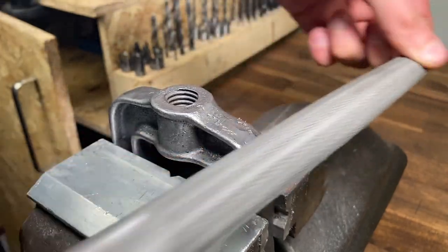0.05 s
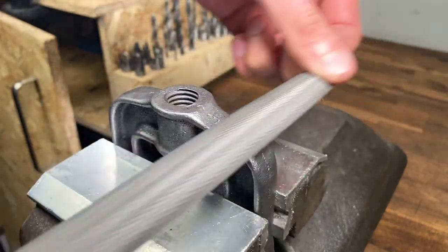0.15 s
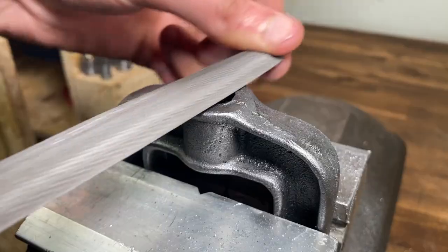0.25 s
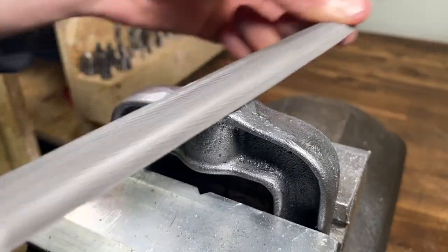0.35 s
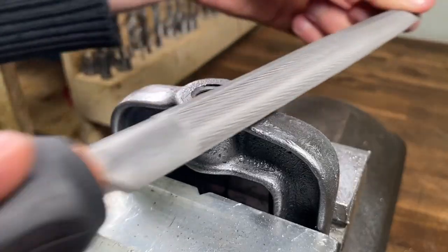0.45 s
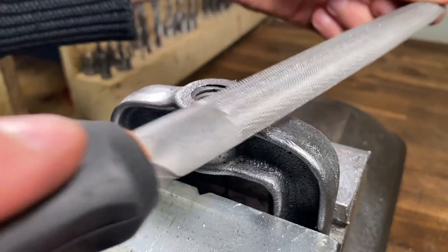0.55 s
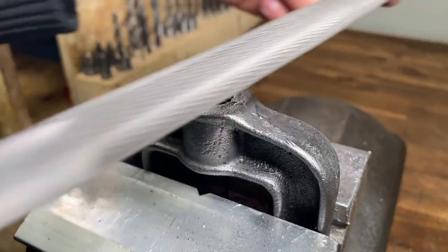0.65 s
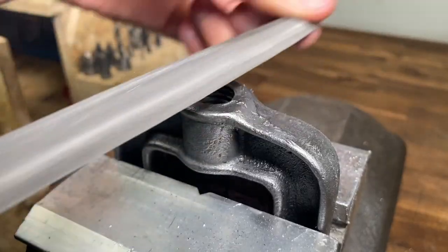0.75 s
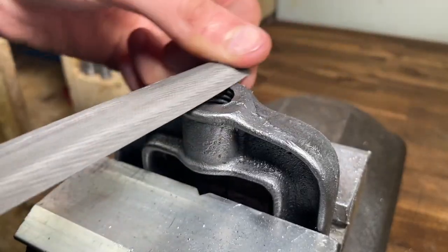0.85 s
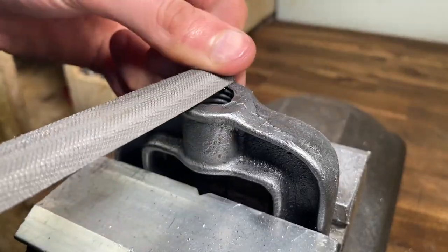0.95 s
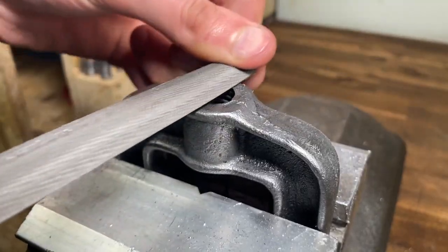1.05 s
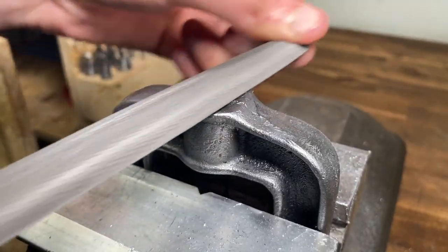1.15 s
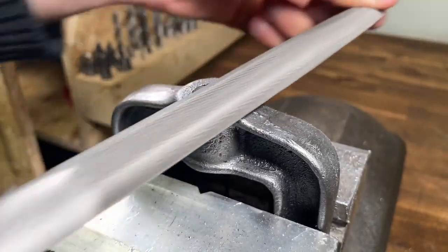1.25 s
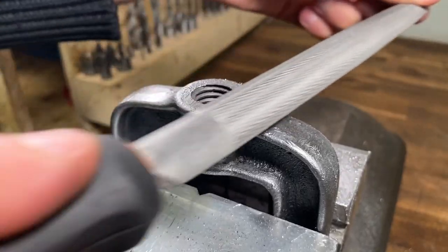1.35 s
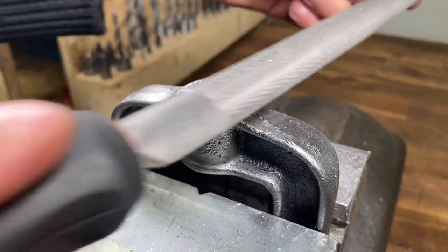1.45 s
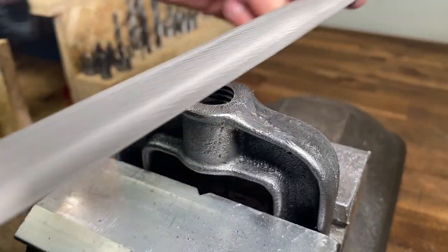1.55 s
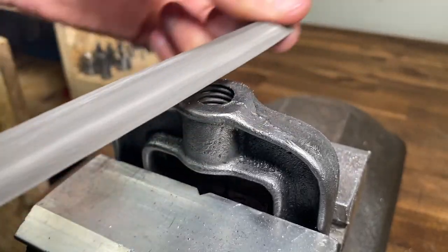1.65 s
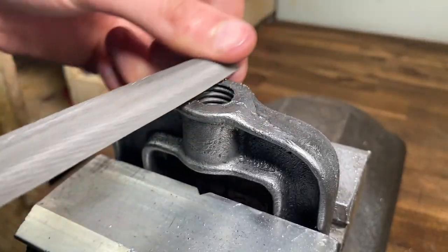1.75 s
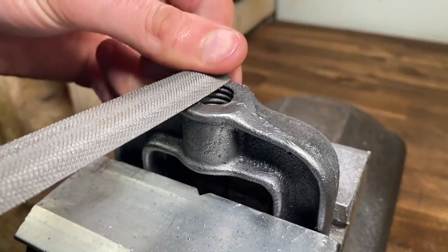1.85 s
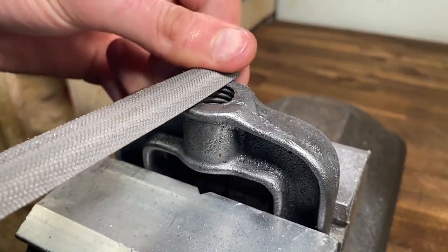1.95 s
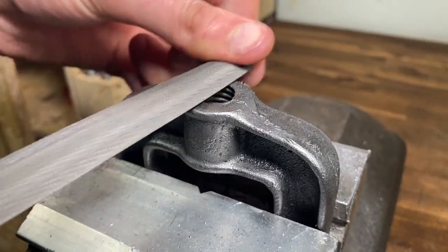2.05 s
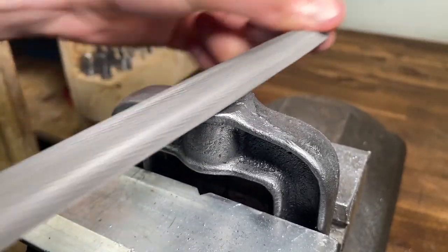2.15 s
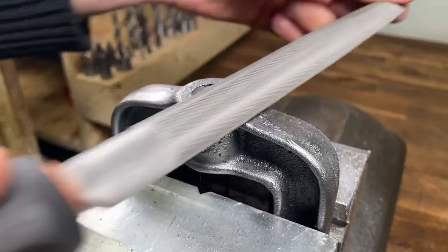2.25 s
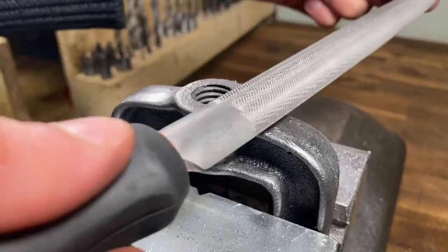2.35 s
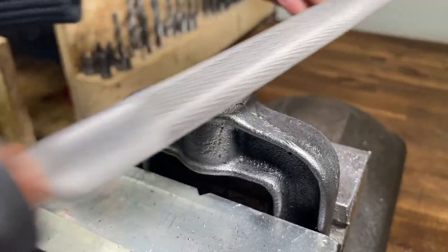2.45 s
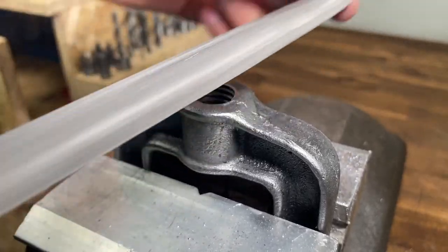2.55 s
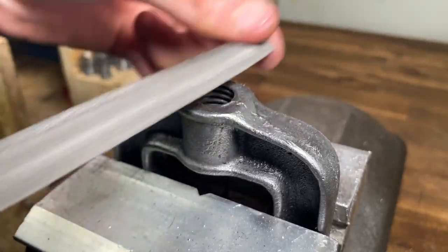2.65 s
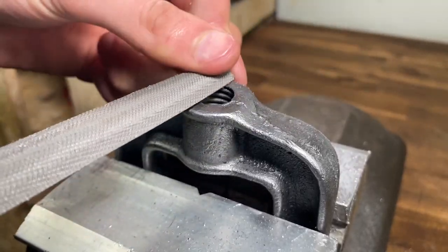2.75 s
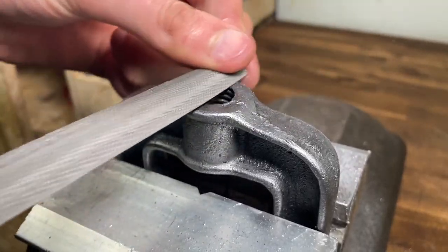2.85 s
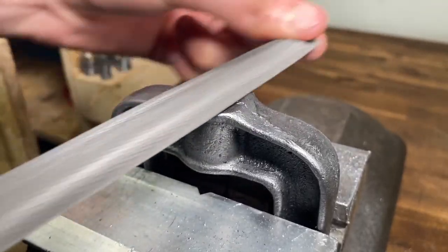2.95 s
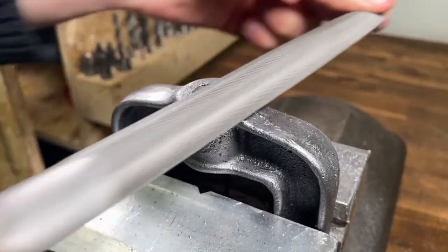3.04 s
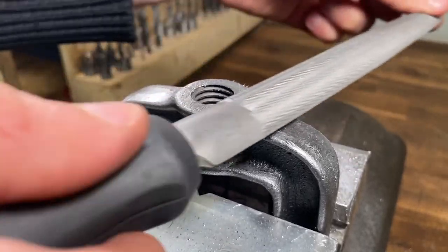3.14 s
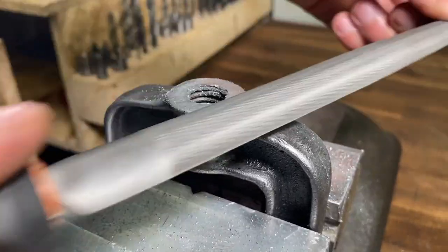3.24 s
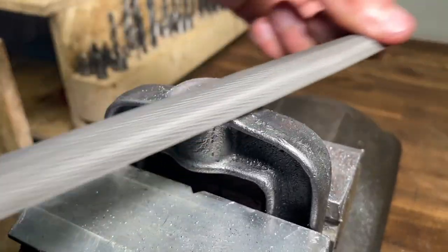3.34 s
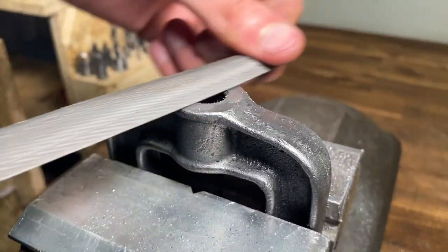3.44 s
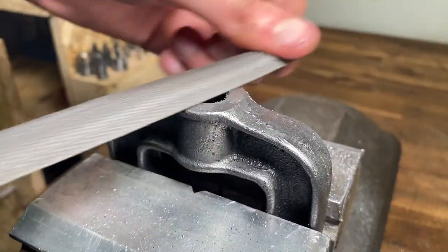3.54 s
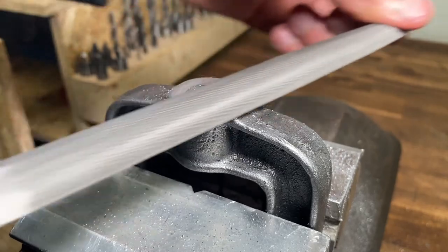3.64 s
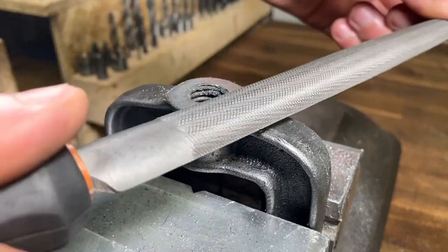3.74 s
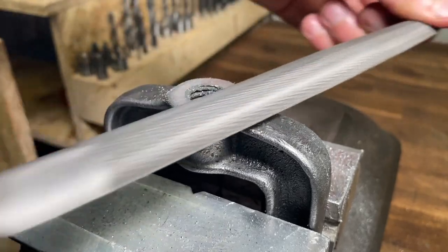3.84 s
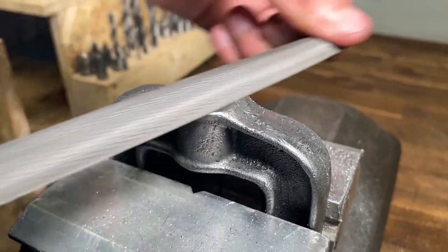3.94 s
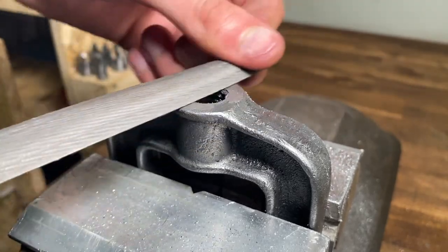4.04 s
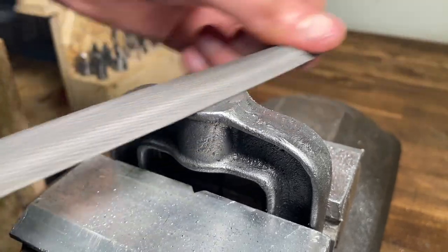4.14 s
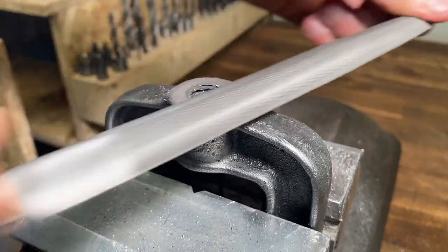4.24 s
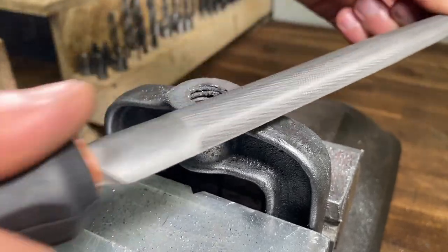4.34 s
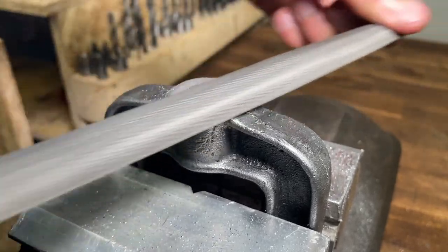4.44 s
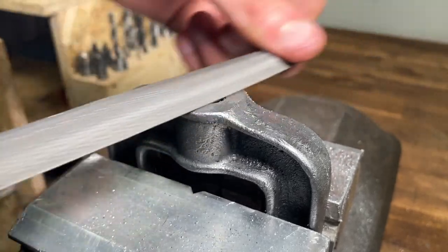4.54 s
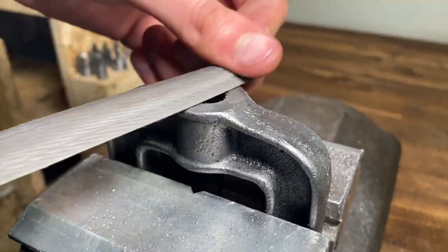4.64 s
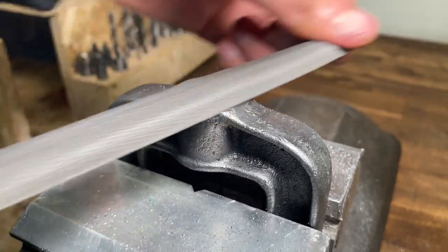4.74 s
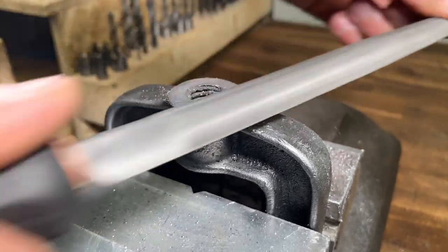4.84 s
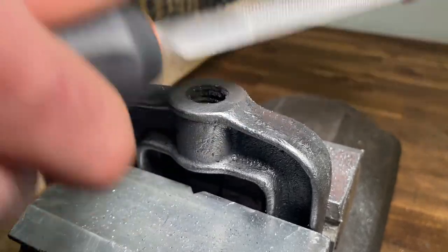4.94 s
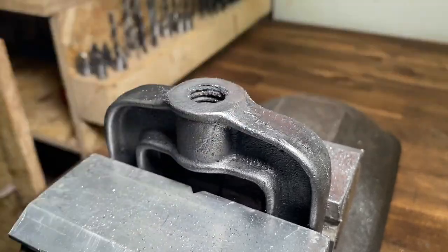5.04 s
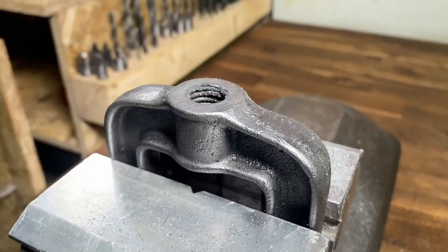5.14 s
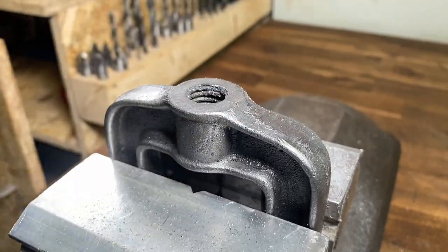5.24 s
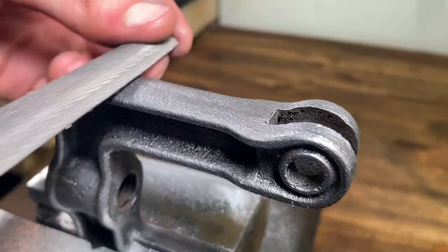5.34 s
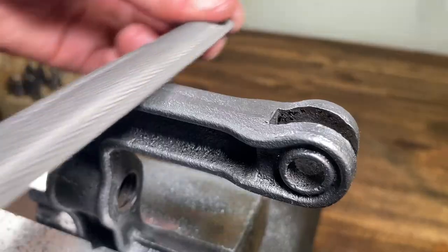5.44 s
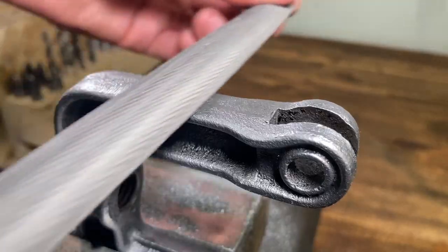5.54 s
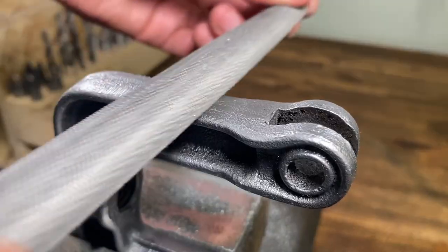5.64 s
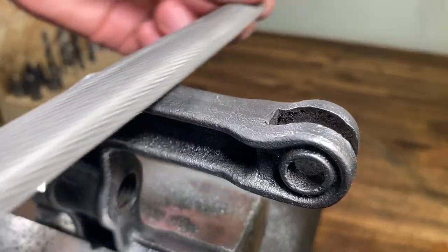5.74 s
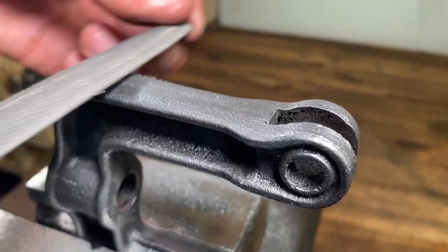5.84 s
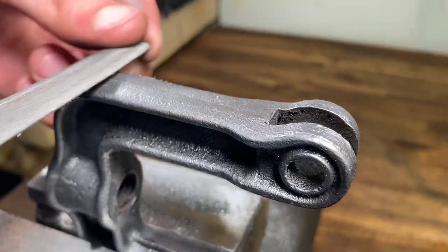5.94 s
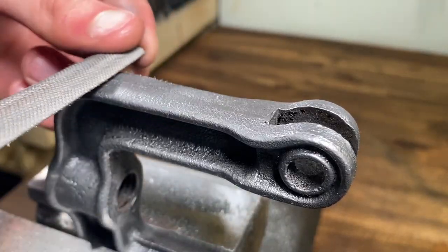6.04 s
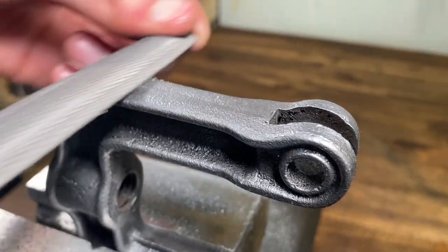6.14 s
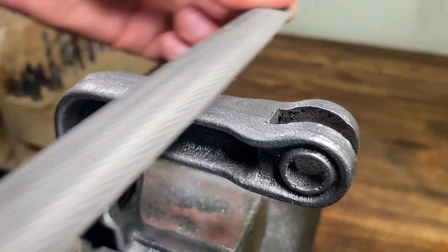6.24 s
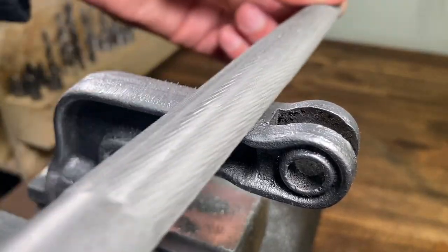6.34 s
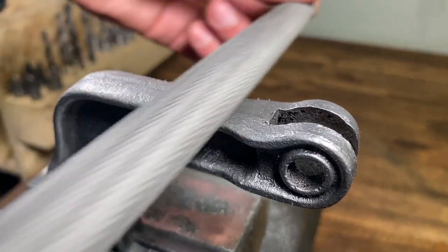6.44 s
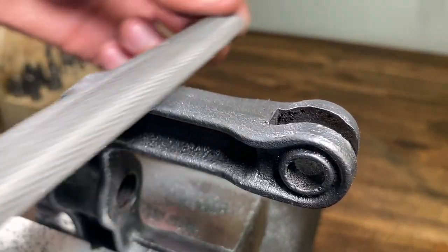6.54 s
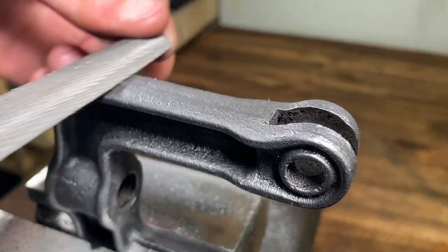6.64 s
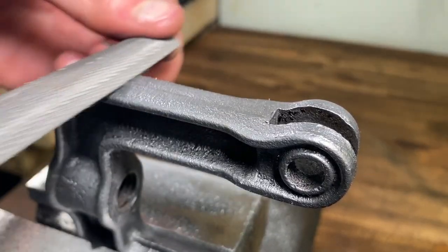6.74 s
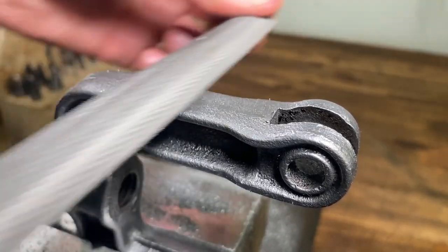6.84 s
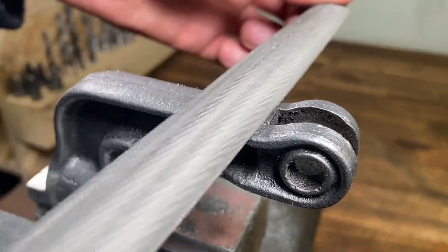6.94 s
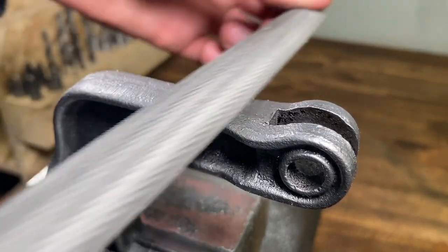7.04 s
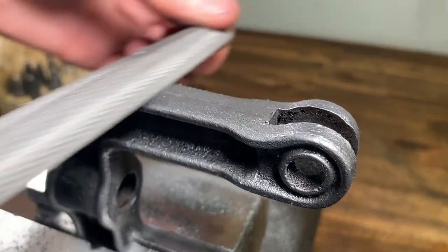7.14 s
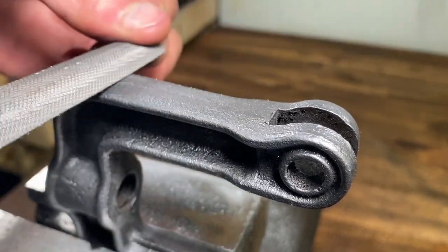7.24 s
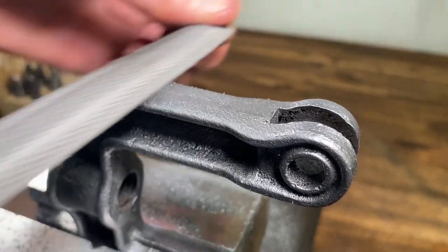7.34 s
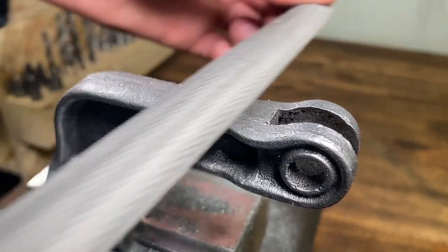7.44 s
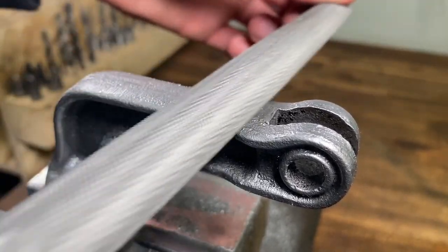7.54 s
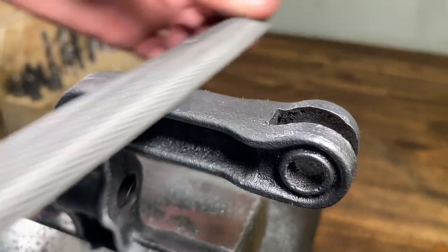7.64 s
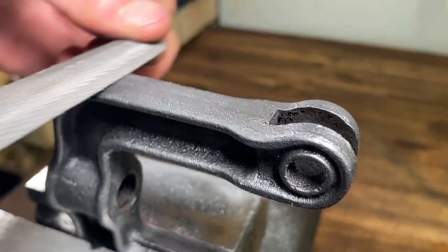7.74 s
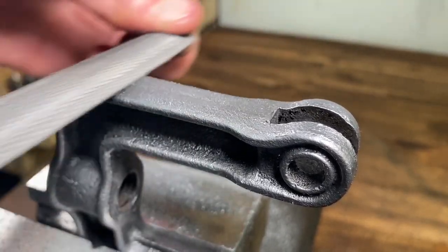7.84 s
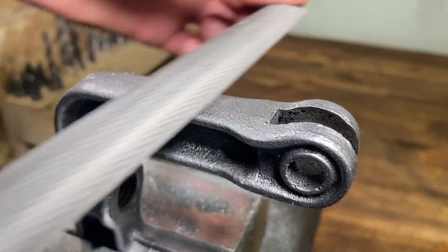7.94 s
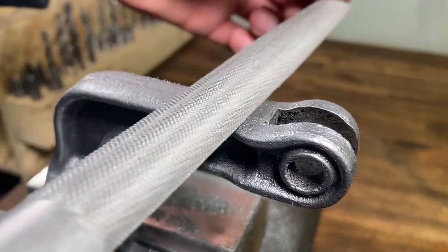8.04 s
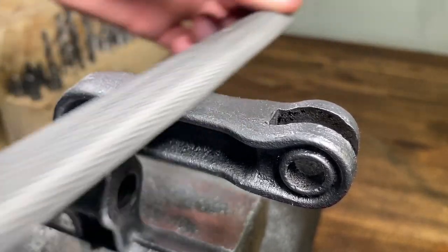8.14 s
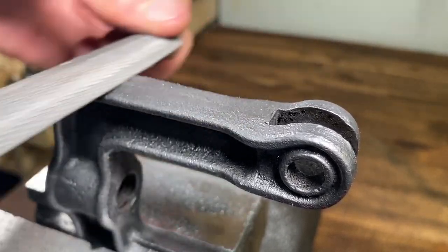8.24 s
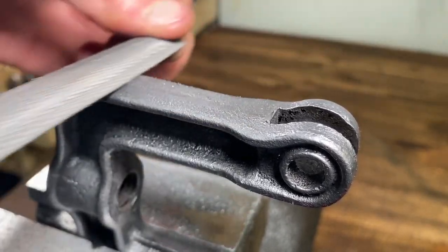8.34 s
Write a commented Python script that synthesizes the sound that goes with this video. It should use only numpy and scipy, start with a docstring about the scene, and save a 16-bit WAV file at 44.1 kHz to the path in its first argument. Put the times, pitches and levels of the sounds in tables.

```python
"""A half-round hand file dresses two cast iron parts held in a bench vice: a bracket, then a lever that rings more.
Teeth bite on each push, as noise chips shaped by arm speed; later the file is dragged back in light, quick pulls.
The rasp excites resonances of file and iron; decaying noise bursts make the touches, faint swells the handling.
Filtered noise gives the bench rumble, dull knocking and still air; a short diffuse tail is the workshop."""
import sys
import numpy as np
from scipy import signal
from scipy.fft import rfft, irfft, next_fast_len
from scipy.io import wavfile

SR = 44100
rng = np.random.default_rng(int(sys.argv[2]) if len(sys.argv) > 2 else 0)


def transcribe(signal):
    """Save signal, clipped to [-1, 1], as a 16-bit WAV file at the path in sys.argv[1]."""
    frames = np.atleast_2d(signal).T
    limited = np.clip(frames, -1, 1)
    pcm = np.round(limited * 32767).astype(np.int16)
    wavfile.write(sys.argv[1], SR, pcm)


N = 369999
TIME = np.arange(N) / SR
SIZE = next_fast_len(N + SR)   # room for filter tails
HZ = np.maximum(np.arange(SIZE // 2 + 1) * SR / SIZE, 1)

# All stroke, touch and swell levels are relative drives of the rasp, ahead of the resonances.
# Cutting strokes, tip towards tang; a low swell power means leaning on the file all the way:
# (start [s], length [s], bite [dB], hiss [dB], swell power [-], pressure rise from start to end [dB])
PUSHES = [ (0.245, 0.27, -33.5, -34.5, 0.92, -13), (0.965, 0.45, -37.5, -36.5, 2.53, 17.5),
          (2.044, 0.29, -34.5, -35, 0.71, -2), (2.81, 0.36, -35, -34, 2.25, 13.5),
          (3.495, 0.27, -41.5, -37, 1.38, -5), (4.065, 0.27, -40.5, -36, 1.83, -6),
          (4.635, 0.26, -40.5, -36, 1.46, 3), (5.285, 0.36, -33, -34.5, 1.82, -4),
          (6.062, 0.32, -33, -33, 1.49, 3.5), (6.712, 0.26, -34.5, -35, 1.43, 6),
          (7.268, 0.24, -36, -34.5, 1.4, 0.5), (7.797, 0.24, -37, -35.5, 1.26, 1),
          (8.31, 0.23, -36, -35.5, 1.8, 5), ]
# Light return strokes, tang towards tip; columns as for the pushes:
# (start [s], length [s], bite [dB], hiss [dB], swell power [-], pressure rise from start to end [dB])
PULLS = [ (3.247, 0.24, -53.5, -49.5, 0.35, 6.5), (3.778, 0.29, -50, -48.5, 0.57, -1),
         (4.338, 0.29, -50.5, -49.5, 0.8, 3), (6.388, 0.29, -43.5, -45.5, 0.69, 0),
         (6.992, 0.25, -41.5, -42.5, 0.8, -2), (7.535, 0.24, -44, -42, 0.73, -1.5),
         (8.06, 0.24, -43, -41.5, 1.38, -2), ]
# File set down on the iron or knocking against it: (time [s], level [dB], 60 dB decay time [s])
TOUCHES = [(0.24, -51, 0.065), (0.86, -54.5, 0.24), (0.875, -50, 0.03), (0.917, -50.5, 0.02),
           (1.829, -58, 0.037), (2.027, -55, 0.24), (2.053, -53, 0.042), (2.696, -44.5, 0.082),
           (2.747, -59, 0.16), (3.26, -48.5, 0.16), (3.782, -60, 0.018), (4.675, -49, 0.037),
           (5.637, -42, 0.022), (5.790, -44, 0.11), (5.802, -49, 0.16), (5.825, -51, 0.038),
           (5.913, -58.5, 0.42), (5.94, -52.5, 0.21), (5.952, -53.5, 0.055), (6.404, -42, 0.03),
           (6.419, -36.5, 0.02)]
# Faint swells: handling rustle, or the blade gliding or turning on the iron:
# (start [s], end [s], level [dB])
FAINT_SWELLS = [(0.638, 0.83, -89), (1.871, 2.012, -64.5), (4.91, 5.114, -79), (5.008, 5.22, -73.5),
                (6.956, 7.036, -65), (7.206, 7.336, -61), (7.48, 7.577, -65), (7.772, 7.84, -68),
                (8.012, 8.108, -57.5), (8.26, 8.36, -64)]
# Gain of the rasp's treble, stronger in quick filing: (time [s], level [dB])
TREBLE_SIZZLE = [(2.2, -9.5), (3.0, -7), (3.6, -5), (4.8, -4), (5.5, -11.5), (7.4, -6)]

# Resonances of blade and part together, lifted most near one contact point (0 tip, 1 tang):
# (frequency [Hz], width [Hz], point [-], spread [-], lift on a push [dB], lift on a pull [dB])
FILE_AND_BRACKET_MODES = [(324, 420, 0.99, 1, -10.5, 6), (450, 170, 0.94, 0.16, 13.5, 2),
                          (908, 150, 0.8, 0.27, 10.5, 0.5), (1648, 990, 0.4, 0.36, 6, 0.5),
                          (2680, 1500, 1, 0.89, 1.5, 0.5), (4370, 390, 1, 0.85, 11.5, 15),
                          (6900, 340, 0.52, 0.12, 5.5, 8)]
FILE_AND_LEVER_MODES = [(424, 23, 0.21, 0.17, -7, 13.7), (673, 62, 0.864, 0.17, -1.5, 13),
                        (1165, 56, 0.19, 0.17, 14.5, 11.6), (1643, 162, 0.34, 0.63, -1, 12.7),
                        (2740, 480, 0.88, 0.35, 9, 14.2), (4464, 274, 0.71, 0.25, 15, 19.5),
                        (6570, 200, 0.52, 0.11, 0, 15.3)]
# Broad response of each part with the file on it: (frequency [Hz], gain [dB])
BRACKET_COLOUR = [(150, 10.5), (300, 1), (550, -3), (900, 1), (1800, -3.5), (3000, 1.5), (5000, 0.5),
                  (7000, 2.5), (9000, 7.5), (10300, 2), (12000, 3), (14800, -13.5), (15700, -6)]
LEVER_COLOUR = [(150, 10.5), (300, -1.5), (550, -6.5), (900, 5), (1800, 3), (3000, 0.5), (5000, -0.5),
                (7000, 5.5), (9000, 5), (10300, -3), (12000, 6.5), (14800, -18), (15700, -2)]
# Modes of each part: (frequency [Hz], width [Hz], left lift [dB], right lift [dB])
BRACKET_MODES = [(429, 13, 7, 11), (865, 20, 10, 7), (996, 18, 9, 12), (1460, 118, 13, 12),
                 (1738, 43, 10, 6), (1852, 80, 16.5, 9), (2278, 45, 9, 12.5), (2555, 70, 8.5, 10.5),
                 (2763, 30, 8, 0), (3138, 145, 6.5, 0), (3738, 70, 8, 5), (8100, 157, 8.5, 7)]
LEVER_MODES = [(197, 16, 9, 9), (391, 15, 5.5, 10), (428, 19, 31.5, 29), (596, 16, 9, 8), (969, 78, 1, 6),
               (1153, 28, 10, 11), (1245, 50, 8, 2), (1625, 70, 10, 11), (2281, 25, 4, 4),
               (3058, 120, 12, 9), (5361, 70, 8, 1), (7177, 9, 15, 15), (8419, 120, 11, 10.5),
               (11420, 40, 13, 13), (14230, 20, 25, 25)]
# Left minus right level: (frequency [Hz], level difference [dB])
BALANCE = [(150, -1.5), (700, 1), (1500, 1), (2700, 4.5), (4200, 7), (6000, 5), (7500, 0), (16000, 0)]
# Phase of the right side against the left: (frequency [Hz], phase [rad])
RIGHT_PHASE = [(450, 0), (700, -1.6), (1000, -.5), (1400, -2), (2000, -.3), (3200, -1.5), (3900, 0),
               (5500, -.8), (7500, 0), (8600, 3), (9300, 3.3), (10500, 6.28), (11700, 6.28), (12700, 9.3),
               (13900, 9.6), (14500, 12.57)]
# Share of rasp power common to both sides: (frequency [Hz], share [0-1])
LIKENESS = [(300, .9), (800, .6), (2000, .6), (4500, .8), (5700, .55), (7200, .9), (15000, .92)]

# Dull knocking in the vice during quick strokes on the bracket: (start [s], end [s], level [dB])
KNOCKING = [(3.628, 3.843, -55.5), (3.845, 3.98, -54), (4.14, 4.45, -61.5), (4.729, 5.05, -56.5)]
# Spectrum of the knocking: (frequency [Hz], relative level [dB])
KNOCKING_COLOUR = [(30, -42), (60, -7), (100, 0.5), (200, 1), (330, -6), (480, -13), (900, -49)]
# Spectrum of the bench under load: (frequency [Hz], relative level [dB])
BENCH_COLOUR = [(20, -40.5), (30, -20.5), (42, -1.5), (72, -0.5), (115, -3.5), (160, -12.5), (200, -9.5),
                (300, -23), (550, -47.5)]
# Spectrum of the still room: (frequency [Hz], relative level [dB])
AIR_COLOUR = [(22, -42), (45, 14.5), (120, 9), (300, -10), (700, -27), (2500, -29.5), (8000, -38.5),
              (16000, -50)]

LEVER_FROM_S = 5.2
BITE_FOLLOWS = 0.65   # the bite swells less than the hiss: share of the swell power
TANG_RISE_DB = 0.5   # bite and hiss are this much stronger at the tang than at the tip
SKIP_DB, SKIP_HZ = 1.8, 34   # the lightly held file skips on a pull: depth and corner rate
AIR_DB = -70.5
CUTOFF_HZ = 15850


def stroke_controls():
    """Stroke kinematics: half-sine speed sets bite and hiss; also gives contact point and pull state."""
    bite, hiss, place = np.zeros((3, N))
    pulling = np.ones(N)   # between strokes the file rests as lightly as on a pull
    for strokes, backwards in ((PUSHES, False), (PULLS, True)):
        for start, length, bite_db, hiss_db, swell, rise_db in strokes:
            near = (TIME > start) & (TIME < start + length)
            progress = (TIME[near] - start) / length
            speed = np.sin(np.pi * progress)   # no cutting where the file turns round
            direction = 1 if backwards else -1
            from_middle = .5 * np.cos(np.pi * progress) * direction
            extra_db = rise_db * (progress - .5) + TANG_RISE_DB * from_middle
            bite[near] += speed ** (swell * BITE_FOLLOWS) * from_db(bite_db + extra_db)
            hiss[near] += speed ** swell * from_db(hiss_db + extra_db)
            place[near] = .5 + from_middle   # 0 tip, 1 tang
            pulling[near] = backwards
    skipping = from_db(pulling * SKIP_DB * drift(SKIP_HZ))
    return bite * skipping, hiss * skipping, place, pulling


def teeth(speed, slow_per_s, fast_per_s, size_db, chatter_db, chatter_hz, grab_db, grab_hz, rub_db):
    """Chip fracture as a Poisson process: uneven chips, densest in mid stroke, clumped by chatter."""
    per_s = slow_per_s + fast_per_s * speed
    cuts = rng.random(N) < per_s / SR
    sizes = from_db(size_db * np.minimum(rng.exponential(1, N), 4))
    # the root keeps the power steady as the chip rate changes
    chips = rms_one(cuts * sizes * rng.standard_normal((3, N)) / np.sqrt(per_s))
    rubbing = from_db(rub_db) * rng.standard_normal((3, N))
    clumps = from_db(chatter_db * drift(chatter_hz) + grab_db * drift(grab_hz))
    return stereo(rms_one((chips + rubbing) * clumps))


def touches_and_swells():
    """Transient envelopes: a touch starts suddenly and decays exponentially; a faint swell rises and fades."""
    out = np.zeros(N)
    for start, level_db, t60 in TOUCHES:
        at = int(start * SR)
        age = TIME[:min(SR // 2, N - at)]
        out[at:at + len(age)] += from_db(level_db) * np.exp(-np.log(1000) * age / t60)
    return out + swells(FAINT_SWELLS)


def shifting(x, lowest_hz, highest_hz, depth_db, rate_hz, count):
    """Moving contact: as it wanders across the blade, neighbouring bands swell and fade on their own."""
    for hz in np.geomspace(lowest_hz, highest_hz, count):
        gain = rms_one(from_db(depth_db * drift(rate_hz)))
        x = x + resonance(x * (gain - 1), hz, hz / 10)
    return x


def rasp(bite, hiss, speed):
    """Broadband excitation: coarse chips give the low bite, fine chips the high hiss."""
    light = touches_and_swells()
    coarse = teeth(speed, slow_per_s=1800, fast_per_s=4000, size_db=1.55, chatter_db=-0.6,
                   chatter_hz=206, grab_db=-0.47, grab_hz=40, rub_db=-2.5)
    fine = teeth(speed, slow_per_s=2000, fast_per_s=8700, size_db=1.5, chatter_db=1.27,
                 chatter_hz=180, grab_db=0.28, grab_hz=50, rub_db=-4.5)
    # a crossover whose two powers add to one
    low = below(2200)
    coarse_part = filtered(coarse * (bite + light), np.sqrt(low))
    fine_part = filtered(fine * (hiss + from_db(-4.5) * light), np.sqrt(1 - low))
    scrape = coarse_part + fine_part
    treble = filtered(scrape, 1 - below(5900))
    sizzle = from_db(np.interp(TIME, *np.transpose(TREBLE_SIZZLE)))
    scrape = scrape + treble * (sizzle - 1)
    scrape = from_db(-1.88) * filtered(scrape, 1 - below(200))
    return from_db(-.5) * shifting(scrape, lowest_hz=1321, highest_hz=7190, depth_db=3.5, rate_hz=20, count=12)


def file_and_part(x, modes, place, pulling, wander_db, wander_hz):
    """Coupled resonance: each mode is lifted near its contact point, unevenly as the grip shifts."""
    for hz, width_hz, point, spread, push_db, pull_db in modes:
        nearness = np.exp(-((place - point) / spread) ** 2)
        stroke_db = push_db + pulling * (pull_db - push_db)
        lift_db = nearness * (stroke_db + wander_db * drift(wander_hz))
        x = x + resonance(x * (from_db(lift_db) - 1), hz, width_hz)
    return x


def casting(x, colour, modes):
    """Forced vibration: an iron part colours the rasp and rings at its modes."""
    x = filtered(x, from_db(at_hz(colour)))
    for hz, width_hz, left_db, right_db in modes:
        lift = from_db([[left_db], [right_db]])
        x = x + (lift - 1) * resonance(x, hz, width_hz)
    return x


def filed_iron(scrape, place, pulling):
    """Source and filter in series: the rasp passes the joint resonances, then the response of the part."""
    on_lever = TIME >= LEVER_FROM_S
    parts = [
        (~on_lever, FILE_AND_BRACKET_MODES, BRACKET_COLOUR, BRACKET_MODES),
        (on_lever, FILE_AND_LEVER_MODES, LEVER_COLOUR, LEVER_MODES),
    ]
    iron = 0
    for in_vice, joint_modes, colour, modes in parts:
        joint = file_and_part(scrape * in_vice, joint_modes, place, pulling, wander_db=0.5, wander_hz=22.2)
        iron = iron + casting(joint, colour, modes)
    # level and phase differences between the two sides
    balance = from_db(at_hz(BALANCE) * [[.5], [-.5]])
    phase = np.exp(1j * at_hz(RIGHT_PHASE) * [[0], [1]])
    return filtered(iron, balance * phase)


def knocking(lumpy_db, lumpy_hz):
    """Amplitude-modulated low noise: spells of uneven dull thudding."""
    uneven = from_db(lumpy_db * drift(lumpy_hz))
    return swells(KNOCKING) * uneven * rumble(KNOCKING_COLOUR, side_db=-10.5)


def bench(speed, pulling, push_db, pull_db, linger_db, linger_s):
    """Damped forced motion: each stroke shakes the bench, a push most, and it settles slowly."""
    load = speed * from_db(push_db + pulling * (pull_db - push_db))
    r = np.exp(-1 / (linger_s * SR))
    settling = from_db(linger_db) * signal.lfilter([1 - r], [1, -r], load)
    return np.hypot(load, settling) * rumble(BENCH_COLOUR, side_db=-13.0)


def workshop(x, t60, treble_t60, dull_hz, wet_db, delay_s):
    """Diffuse reverberation: a short exponential noise tail whose treble dies first."""
    age = TIME[:SR]
    echoes = rng.standard_normal((2, SR)) * (age > delay_s)
    body = echoes * np.exp(-np.log(1000) * age / t60)
    treble = echoes * np.exp(-np.log(1000) * age / treble_t60)
    low = below(dull_hz)
    tail = rfft(body, SIZE) * low + rfft(treble, SIZE) * (1 - low)
    return from_db(wet_db) * filtered(x, tail / np.sqrt(np.sum(body ** 2) / 2))


def still_air():
    """Stationary random noise: the steady, mostly low sound of the still room."""
    return from_db(AIR_DB) * rumble(AIR_COLOUR, side_db=-9.5)


def rumble(colour, side_db):
    """Mid-side synthesis: coloured noise, mostly shared by both sides, of rms 1."""
    mid, side = filtered(rng.standard_normal((2, N)), from_db(at_hz(colour)))
    return rms_one(mid + from_db(side_db) * side * [[1], [-1]])


def stereo(three):
    """Partial coherence: one shared and two private signals make a partly alike pair."""
    alike = np.clip(at_hz(LIKENESS), 0, 1)
    return filtered(three[0], np.sqrt(alike)) + filtered(three[1:], np.sqrt(1 - alike))


def resonance(x, hz, width_hz):
    """Damped oscillator: one mode with gain 1 at its peak."""
    b, a = signal.iirpeak(hz, hz / width_hz, fs=SR)
    return signal.lfilter(b, a, x + 1e-18)   # the tiny offset avoids denormal numbers


def swells(spells):
    """Half-sine envelopes: the sum of a rise and fall for each (start, end, level) row."""
    out = np.zeros(N)
    for start, end, level_db in spells:
        progress = np.clip((TIME - start) / (end - start), 0, 1)
        out += from_db(level_db) * np.sin(np.pi * progress)
    return out


def drift(rate_hz):
    """Low-passed Gaussian noise: a random wander of rms 1."""
    return rms_one(filtered(rng.standard_normal(N), below(rate_hz)))


def below(hz):
    """Smooth low-pass magnitude: gain one half at the corner."""
    return 1 / (1 + (HZ / hz) ** 4)


def filtered(x, gain):
    """Convolution theorem: apply a gain per frequency."""
    return irfft(rfft(x, SIZE) * gain, SIZE)[..., :N]


def at_hz(points):
    """Logarithmic frequency scale: read a (frequency, value) table on the frequency grid."""
    hz, value = np.transpose(points)
    return np.interp(np.log(HZ), np.log(hz), value)


def rms_one(x):
    """Power normalisation: scale to rms 1."""
    return x / np.sqrt(np.mean(x ** 2) + 1e-20)


def from_db(db):
    """Logarithmic level: decibels to amplitude gain."""
    return 10 ** (np.asarray(db) / 20)


def scene():
    """Superposition: filed iron and its reverberation over knocking, bench and air."""
    bite, hiss, place, pulling = stroke_controls()
    speed = 2 * np.sqrt(np.clip(place * (1 - place), 0, 1))   # 1 in mid stroke, 0 at its ends
    iron = filed_iron(rasp(bite, hiss, speed), place, pulling)
    thuds = knocking(lumpy_db=4, lumpy_hz=4.8)
    shaking = bench(speed, pulling, push_db=-53.5, pull_db=-65.5, linger_db=3.5, linger_s=0.061)
    room = workshop(iron, t60=0.35, treble_t60=0.13, dull_hz=3100, wet_db=-11.0, delay_s=0.0055)
    return iron + thuds + shaking + room + still_air()


def record(dry):
    """Band limitation: a steep low-pass cuts the top."""
    return filtered(dry, 1 / (1 + (HZ / CUTOFF_HZ) ** 200))


dry = scene()
out = record(dry)
transcribe(out)
```